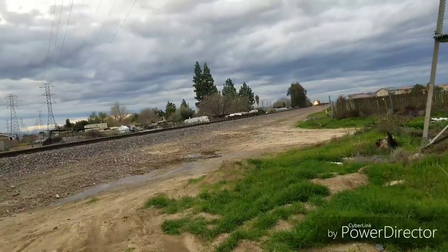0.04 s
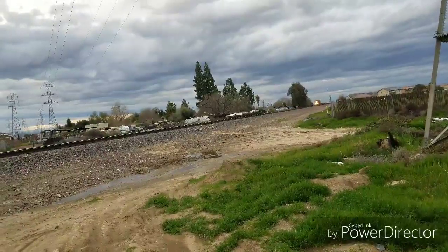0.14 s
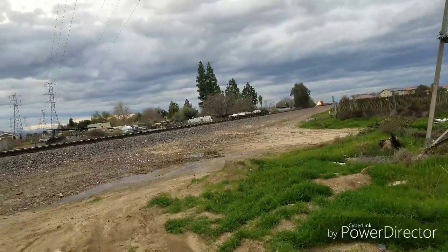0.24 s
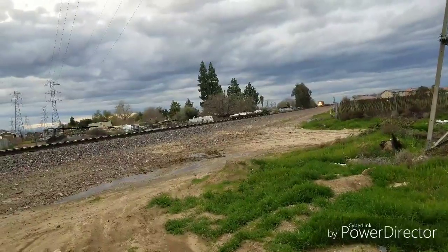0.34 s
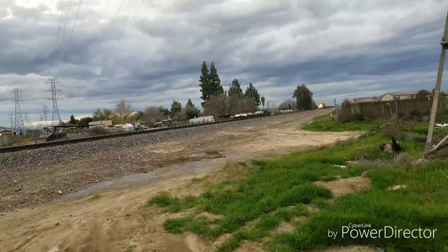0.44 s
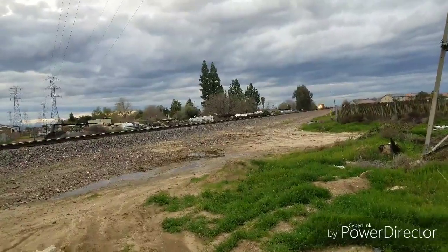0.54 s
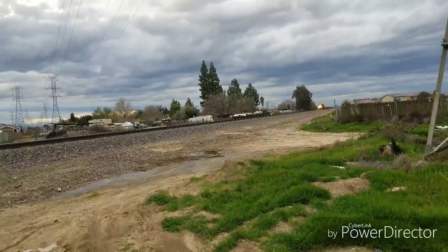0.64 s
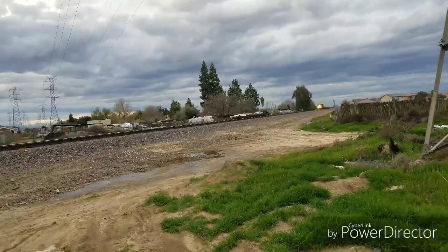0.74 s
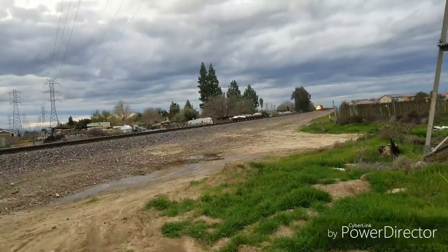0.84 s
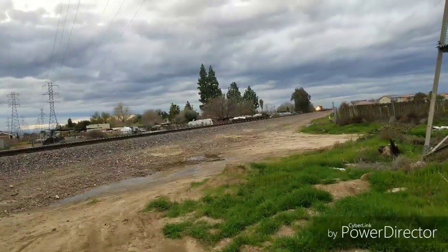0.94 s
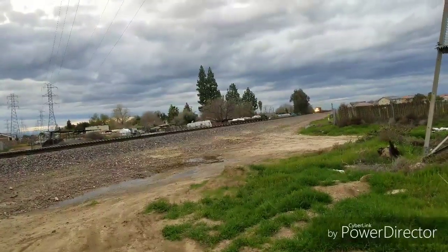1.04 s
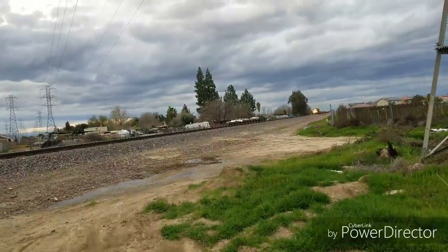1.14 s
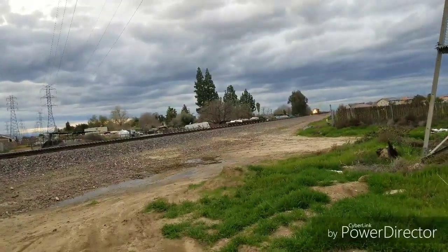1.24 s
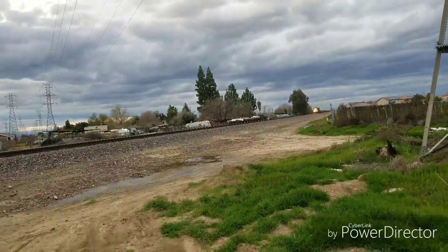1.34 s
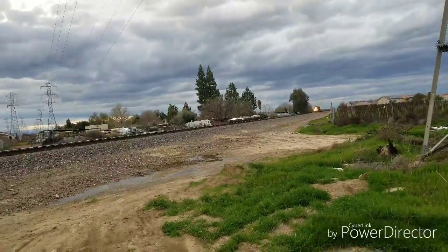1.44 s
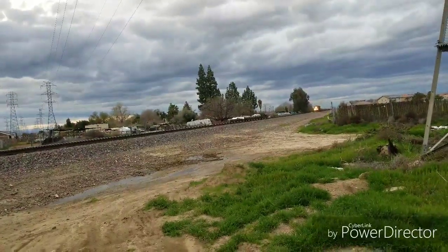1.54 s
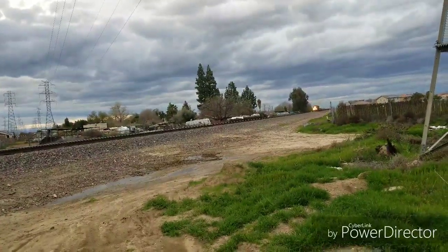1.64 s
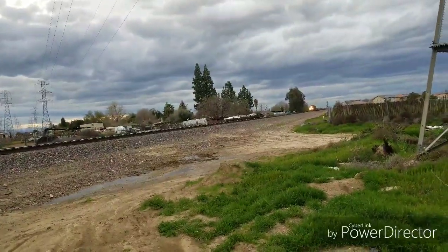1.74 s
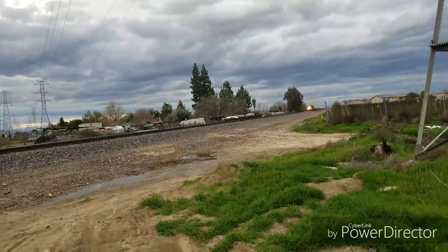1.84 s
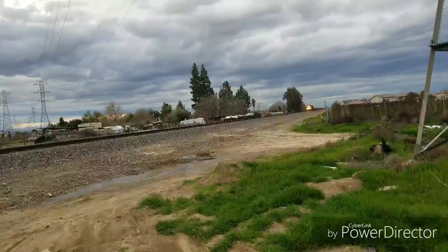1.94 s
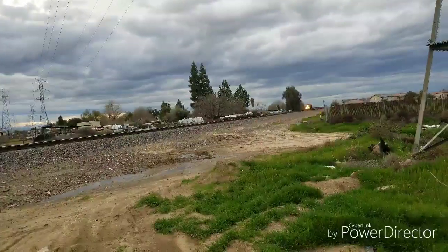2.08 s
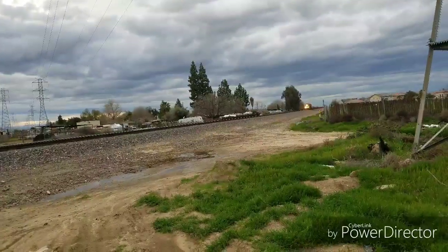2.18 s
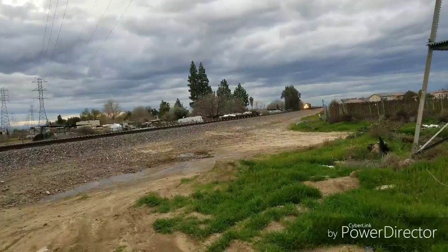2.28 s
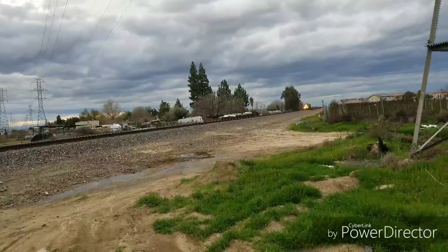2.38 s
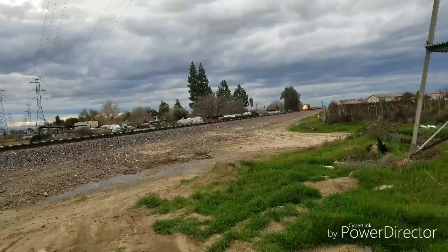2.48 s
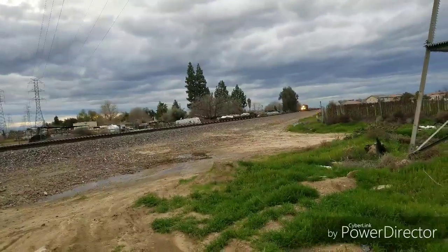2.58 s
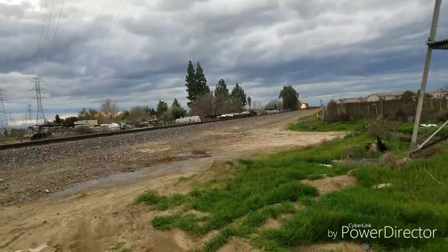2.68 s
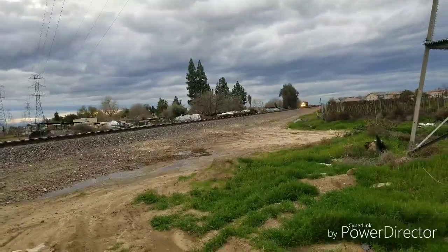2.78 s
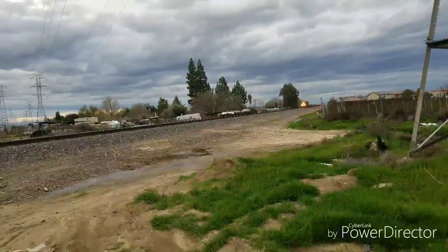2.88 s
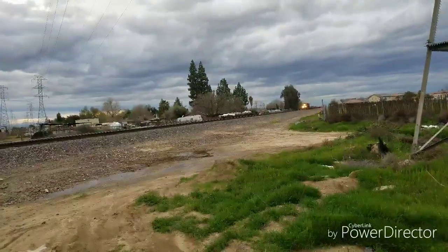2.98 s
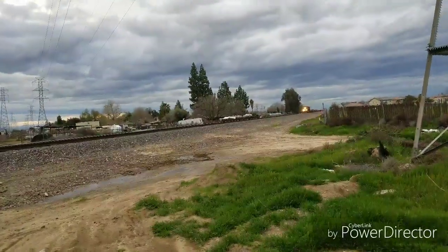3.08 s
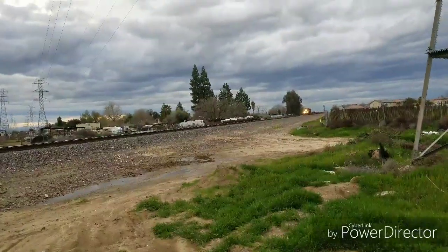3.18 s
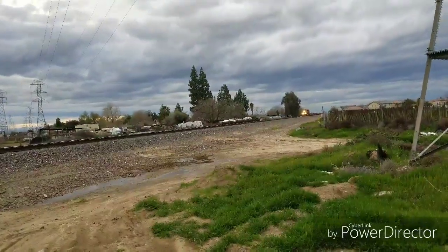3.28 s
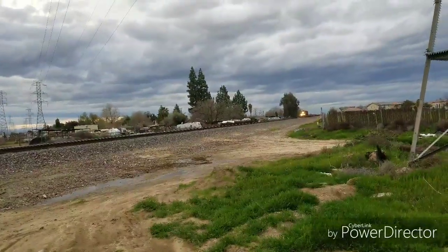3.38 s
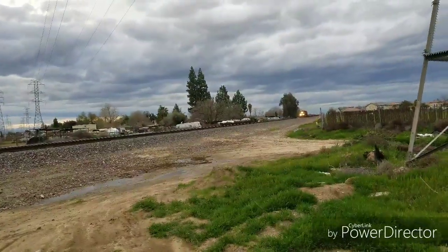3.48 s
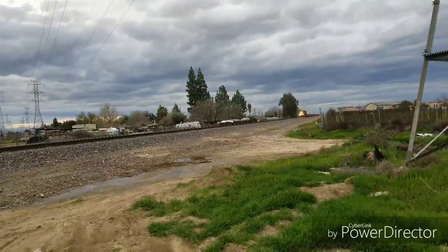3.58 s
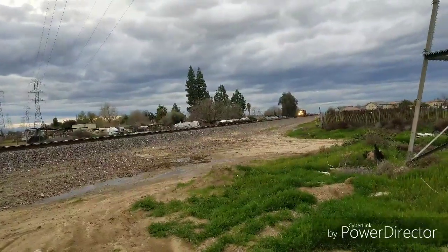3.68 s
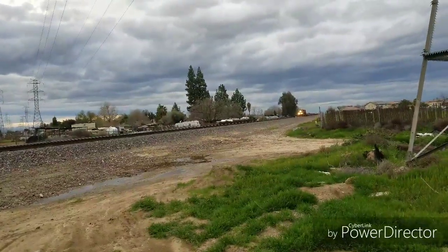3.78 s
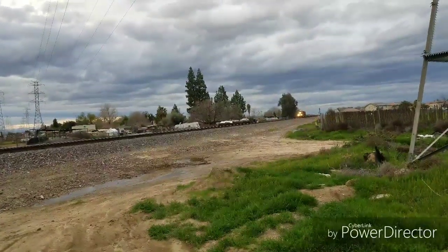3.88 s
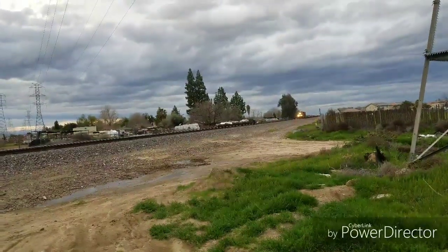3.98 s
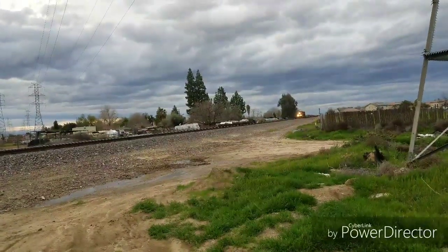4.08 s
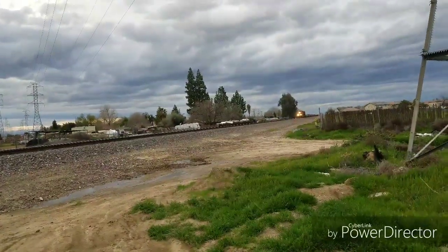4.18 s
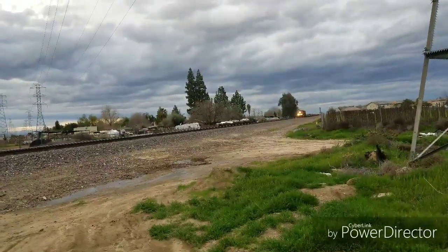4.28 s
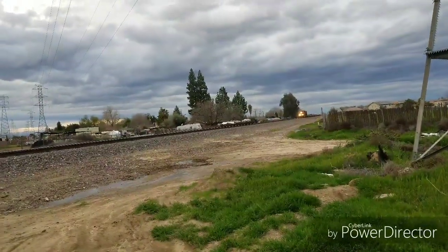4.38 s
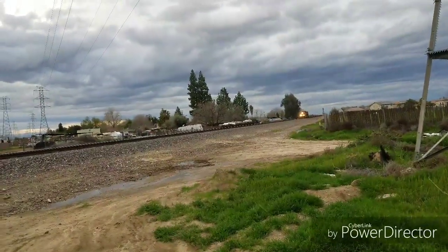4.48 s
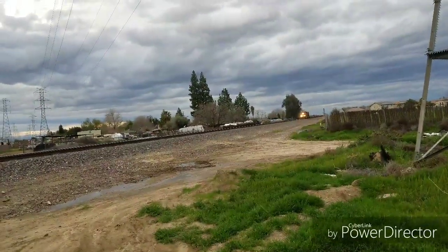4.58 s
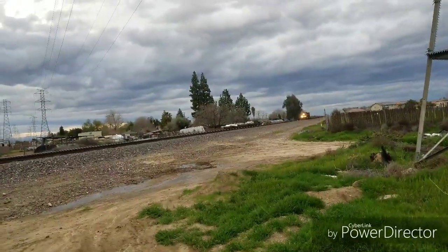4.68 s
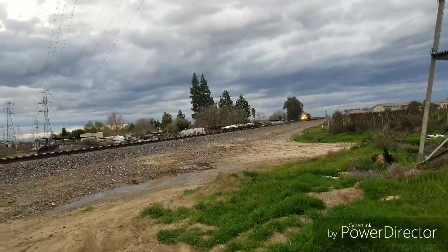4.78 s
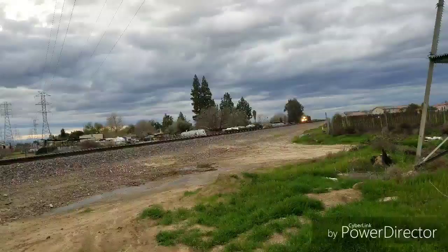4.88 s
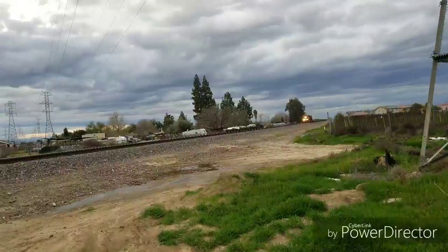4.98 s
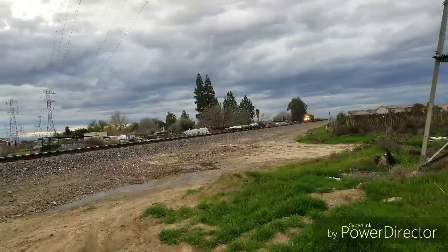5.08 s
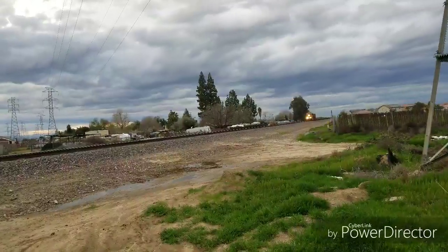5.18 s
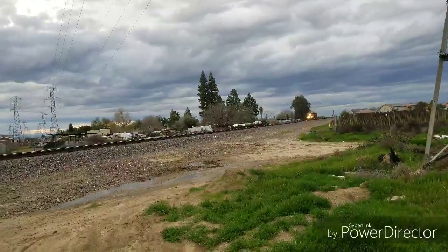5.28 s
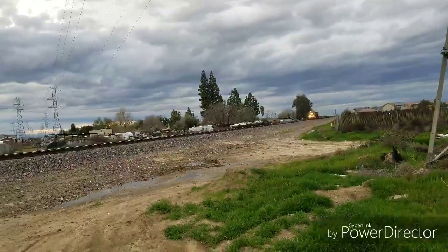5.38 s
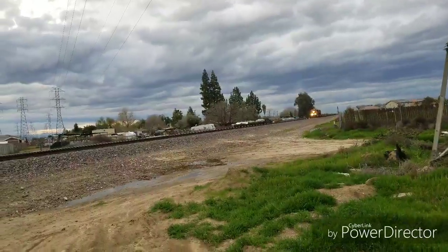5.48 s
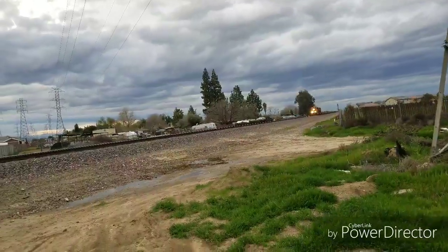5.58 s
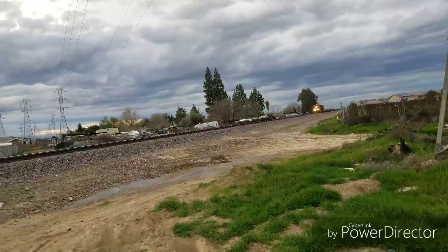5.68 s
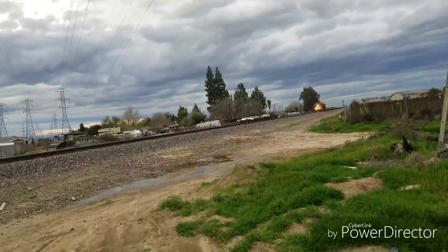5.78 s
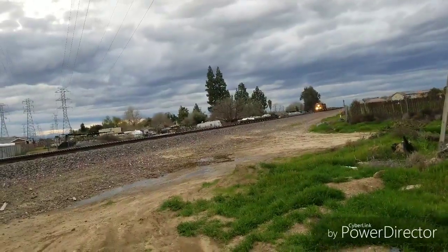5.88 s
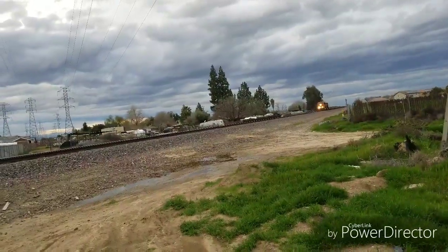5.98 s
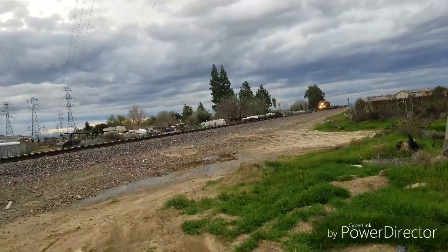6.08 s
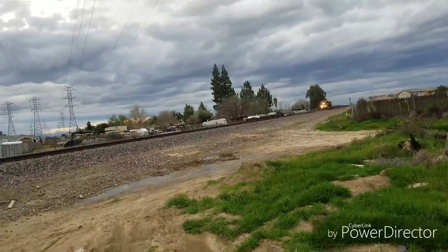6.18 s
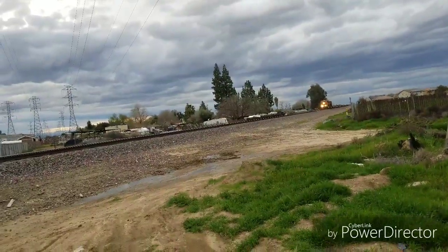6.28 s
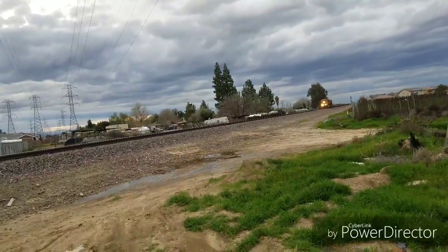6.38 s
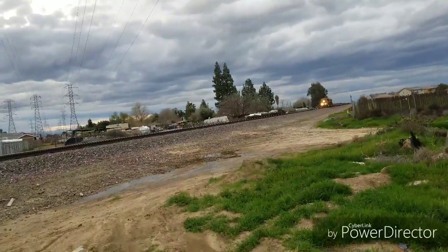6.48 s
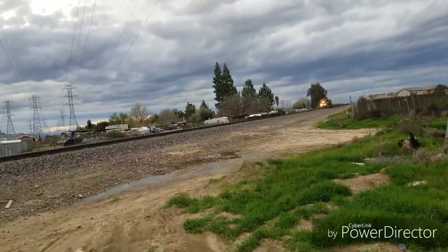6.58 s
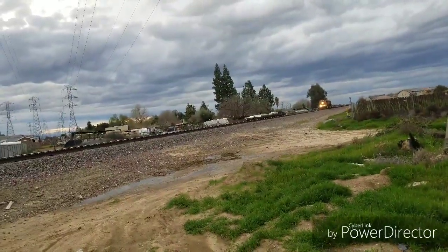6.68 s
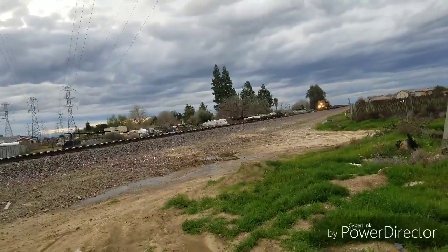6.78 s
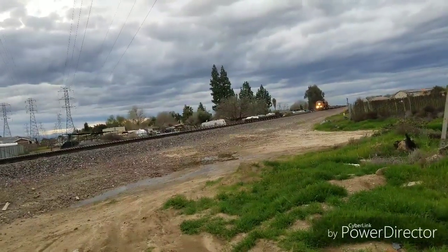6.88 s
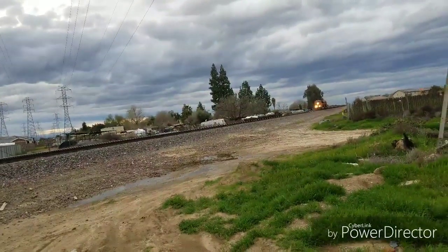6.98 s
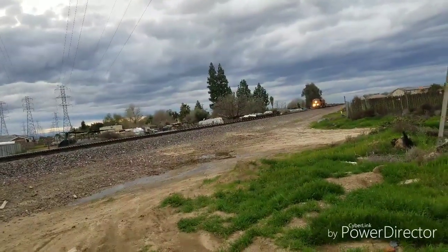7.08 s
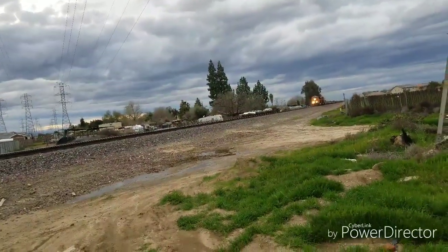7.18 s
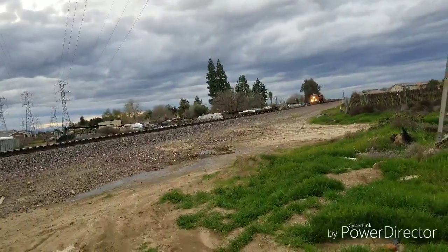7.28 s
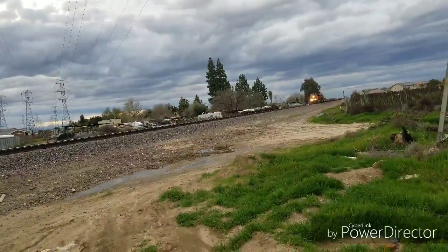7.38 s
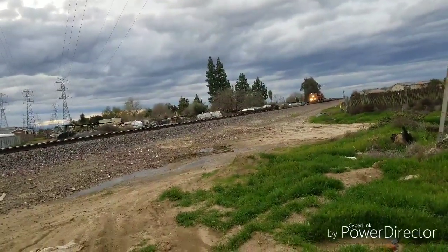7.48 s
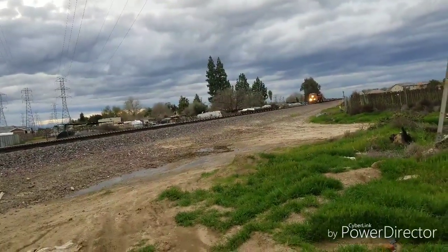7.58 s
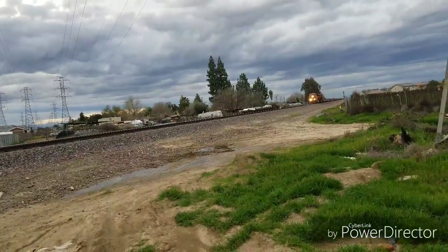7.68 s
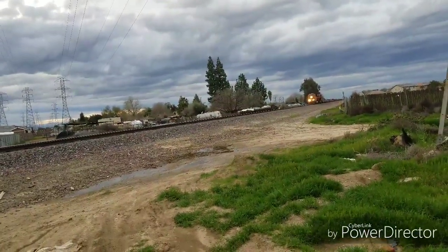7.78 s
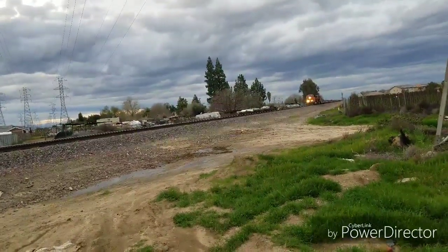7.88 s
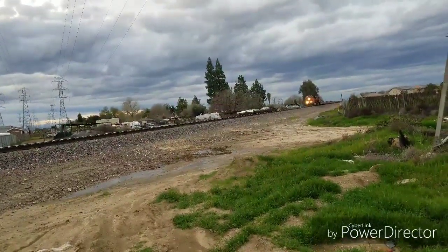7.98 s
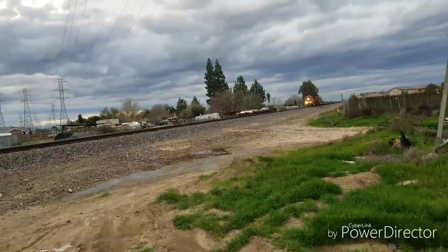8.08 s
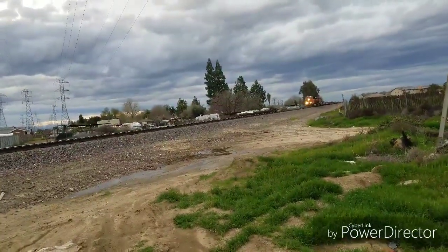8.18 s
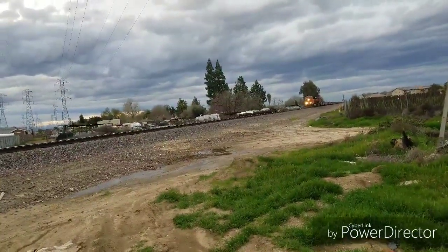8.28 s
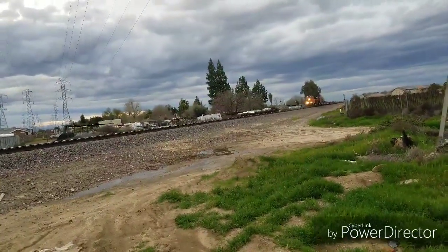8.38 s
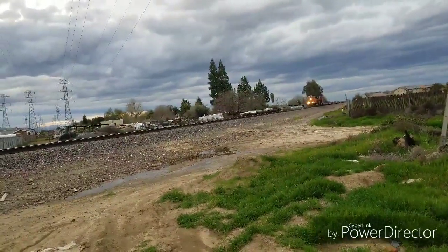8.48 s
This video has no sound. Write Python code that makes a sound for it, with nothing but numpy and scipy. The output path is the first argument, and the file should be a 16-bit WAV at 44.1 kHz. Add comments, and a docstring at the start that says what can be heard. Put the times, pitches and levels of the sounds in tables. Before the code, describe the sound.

The low engine drone and rumble of a far diesel train slowly swell, with distant highway traffic and briefly singing tyres behind.

```python
"""A distant freight train approaching

A diesel train comes up the line at full throttle: its periodic exhaust drones and throbs ever louder
over a growing rumble, gear whine and wheel hiss. Traffic roars and tyre treads sing on a far highway,
and a small bird chirps twice. Close by, a camera's lens drive fizzes on and off through the resonances
of its case, which rustles and ticks under the fingers."""
import sys
import numpy as np
from scipy import signal
from scipy.fft import rfft, irfft
from scipy.io import wavfile

SR = 44100
rng = np.random.default_rng(int(sys.argv[2]) if len(sys.argv) > 2 else 0)


def store_pcm(level_fs):
    """Save levels as 16-bit WAV."""
    pcm = np.round(np.clip(level_fs, -1, 1) * 32767).astype(np.int16)
    wavfile.write(sys.argv[1], SR, np.atleast_2d(pcm).T)


N = 376613
T = np.arange(N) / SR
PROGRESS = T / T[-1]
HZ = np.fft.rfftfreq(N, 1 / SR)
CYCLE_HZ = 8.785  # one four-stroke cycle, two turns of the crankshaft

# exhaust harmonics: (multiple of the cycle [1], relative level [dB])
EXHAUST_HARMONICS = [(1, -44), (2, -39), (3, -33), (4, -31), (5, -23), (6, -12), (7, -16), (8, -19),
                     (9, -2), (10, -13), (11, -8), (12, -8), (13, -17), (14, -9), (15, 0), (16, -8),
                     (17, -14), (18, -8), (19, -15), (20, -16), (21, -10), (22, -12), (23, -21), (24, -16),
                     (25, -13), (26, -14), (27, -15), (28, -12), (29, -21), (30, -17), (31, -22), (32, -26),
                     (33, -22), (34, -25), (35, -28), (36, -31), (37, -28)]
# growth of the exhaust on approach: (time [s], level [dB])
EXHAUST_LEVEL = [(0, -32.5), (1.5, -30.5), (3.3, -28.5), (4.2, -28), (5.7, -26), (6.8, -24.3), (7.4, -22),
                 (8.54, -21.5)]
# the harmonic that booms out as the train nears: (time [s], relative gain [dB])
BOOM_GAIN = [(0, -8), (.8, -8.5), (1.5, -6.5), (2.7, -3.5), (4, -1.5), (6.4, -2.5), (7.3, 3), (8.54, 1.5)]
# growth of the wheel hiss: (time [s], level [dB])
WHEEL_LEVEL = [(0, -65.5), (2, -60), (4, -58.5), (5.5, -56.5), (7, -50.5), (8.54, -48.5)]
# locomotive tones: (frequency [Hz], rms waver [Hz], final level [dB], total rise [dB])
MACHINE_TONES = [(376, 1, -54.5, 14), (1079, 6, -56, 4), (1619, 7, -57.5, 13), (2159, 7, -64.5, 11),
                 (4114, 25, -67, 20)]
# noise spectra of the sources: (frequency [Hz], relative spectral density [dB])
RUMBLE_SPECTRUM = [(15, -38), (32, -21), (44, -12), (54, 5.5), (68, 3), (95, -4), (108, 4.5), (126, -5.5),
                   (150, -1.5), (240, -4.5), (300, -14), (385, -20.5), (440, -34), (1500, -76)]
WHEEL_SPECTRUM = [(460, -10.5), (700, 4), (1300, -14), (1520, 2.5), (1900, -4), (2400, -4.5), (3200, -13),
                  (4200, -4), (5800, -10), (6600, -36.5), (8200, -42)]
HIGHWAY_SPECTRUM = [(200, -11), (470, -11.5), (680, -6), (900, -3), (1030, 2), (1130, -7.5), (1330, -14),
                    (1550, -9.5), (2000, -15.5), (3100, -27), (5800, -34.5), (7000, -47.5)]
LENS_SPECTRUM = [(2500, -10), (5500, -16), (7000, -29), (8400, -36), (9300, -15.5), (10900, 6), (11700, -1),
                 (12850, 13), (13500, -2.5), (14000, 8.5), (15000, 5), (15500, -14.5)]
RUSTLE_SPECTRUM = [(1500, -23), (3200, -3), (4200, -3.5), (5000, 1.5), (5800, 4), (6600, -10), (8200, -23),
                   (9400, -6), (11000, -6), (15000, -36.5)]
TICK_SPECTRUM = [(1500, -17), (3000, -6.5), (5000, 1), (6200, -2.5), (7800, -12.5), (9500, 1.5), (11000, 4),
                 (12500, -8), (15500, -10)]
# runs of the lens drive and strokes of the fingers: (start [s], duration [s], relative level [dB])
DRIVE_RUNS = [(.02, 0.086, -62.5), (.95, 0.5, -60.5), (1.43, 0.36, -57.5), (2.16, .61, -58.5),
              (2.89, 0.12, -60.5), (3.46, .78, -55.5), (4.79, 0.074, -59), (5.34, .24, -60.5),
              (5.63, 0.39, -53), (6.17, .11, -59), (6.39, 0.14, -54.5), (6.83, 0.51, -50),
              (7.46, 0.061, -52.5), (7.61, 0.095, -50.5), (8.07, .19, -52.5), (8.32, 0.24, -48)]
FINGER_STROKES = [(.4, .1, -60), (.57, 0.11, -56), (.82, 0.3, -60.5), (1.24, .16, -58), (1.62, 0.18, -58),
                  (2.02, 0.1, -60), (2.35, .2, -59.5), (2.66, 0.19, -58.5), (3.1, 0.13, -59.5),
                  (3.4, .16, -58), (3.72, 0.19, -60.5), (4.13, 0.082, -56.5), (4.78, .12, -58),
                  (5.12, 0.28, -59), (5.52, 0.077, -53), (5.86, .09, -54.5), (6.2, 0.1, -57),
                  (6.93, 0.075, -54), (7.22, .12, -57), (7.67, 0.056, -53)]
# singing tyres: (start [s], duration [s], pitch [Hz], relative level [dB], upper fifth re pitch [dB])
TYRE_PASSES = [(.53, .5, 1047, -51, -15), (1.62, 0.21, 1053, -50.5, -13), (3.598, 0.21, 1041, -61, 4.5),
               (3.79, 0.084, 1041, -43.5, -5.5), (3.95, 0.065, 1035, -40, -14),
               (4.42, 0.23, 1053, -47.5, -9), (4.69, 0.14, 1025, -45, -16), (5, 0.31, 993, -51.5, -9.5),
               (6.18, 0.64, 1011, -47.5, -14), (6.85, .3, 999, -50.5, -7), (7.2, .38, 982, -49, -22)]
# case ticks: (time [s], peak [dB], resonance [Hz], fall to either side [dB/octave], left - right [dB])
CASE_TICKS = [(0.572, -44, 4470, 16, -6), (0.598, -34, 11100, -1, 0), (0.606, -35, 11100, -1, -5),
              (0.64, -41, 11000, -2, -2), (0.7267, -35.5, 12500, -1, -1), (.79, -49, 5050, 15, -1),
              (1.151, -41, 5200, 14, -1), (2.0368, -35, 10000, 3, -1), (2.053, -43, 10900, -2, -4),
              (2.698, -37, 3800, 21, -5), (3.273, -40, 10600, -4.5, 2), (3.707, -44.5, 9200, 8, 5),
              (4.655, -46, 10400, 2, 1), (4.8485, -37, 10800, 4, -1), (4.9092, -43.5, 4715, 12, -9),
              (4.9696, -37.5, 4790, 5, -4), (5.314, -35.5, 3020, 14, -3), (5.652, -38, 11500, -4, -3),
              (6.2, -42, 3500, 11, -2)]
# bird calls: (start [s], duration [s], start pitch [Hz], end pitch [Hz], level [dB])
BIRD_CHIRPS = [(1.868, 0.057, 3080, 2815, -69), (5.23, 0.074, 4700, 5350, -63)]
# likeness of noise at the two microphone ports: (frequency [Hz], correlation [1])
PORT_CORRELATION = [(60, .99), (150, .997), (280, .992), (500, .92), (1000, .6), (2000, .32), (4000, .2)]
# balance of noise between the ports: (frequency [Hz], left - right [dB])
PORT_BALANCE = [(50, 5), (130, 0.8), (400, 3), (1000, 0.9), (2000, -1), (4500, -3), (9000, 3)]


def amp(db):
    """Amplitude ratio of a level in decibels."""
    return 10 ** (np.asarray(db) / 20)


def pan(db):
    """Left and right gains for a level difference of db."""
    return amp([[db / 2], [-db / 2]])


def unit_rms(x):
    """Normalisation to an rms of 1."""
    return x / np.sqrt(np.mean(abs(x) ** 2) + 1e-30)


def over_time(rows):
    """Linear interpolation of (time, value) rows at every sample."""
    return np.interp(T, *np.transpose(rows))


def over_frequency(rows, hz=HZ):
    """Interpolation of (frequency, value) rows on a logarithmic frequency axis."""
    row_hz, value = np.transpose(rows)
    return np.interp(np.log(hz + 1), np.log(row_hz), value)


def drift(rate_hz):
    """Random fluctuation of rms 1: a superposition of sinusoids below rate_hz."""
    t = np.linspace(0, T[-1], num=1024)
    speeds, phases = rng.random((2, 12, 1))
    waves = np.sin(2 * np.pi * (rate_hz * speeds * t + phases))
    return np.interp(T, t, unit_rms(waves.sum(0)))


def stereo_noise(spectrum):
    """Partially coherent noise: the two ports agree at long wavelengths and differ at short ones."""
    common, independent = rfft(rng.standard_normal((2, N)))
    correlation = np.clip(over_frequency(PORT_CORRELATION), -1, 1)
    right = correlation * common + np.sqrt(1 - correlation ** 2) * independent
    side = amp(over_frequency(PORT_BALANCE) / 2)
    pair = irfft(np.array([common * side, right / side]) * spectrum, N)
    return pair / np.sqrt(np.mean(pair.mean(0) ** 2))


def gate(start_s, length_s, attack_s, release_s):
    """Envelope with a linear rise, a hold and an exponential decay."""
    rise = np.clip((T - start_s) / attack_s, 0, 1)
    return rise * np.exp(-np.maximum(T - start_s - length_s, 0) / release_s)


def bursts(rows, rest_db, attack_s, release_s):
    """Envelope of an intermittent source that swells from a resting level for each row."""
    gain = amp(rest_db)
    for start_s, length_s, db in rows:
        gain = np.maximum(gain, amp(db) * gate(start_s, length_s, attack_s, release_s))
    return gain


def exhaust(boom_order=15, fade_db=0.16, brighten_db=2):
    """Harmonic series: unequal cylinders sound every multiple of the cycle; moving air fades each."""
    cycles = CYCLE_HZ * T + .003 * drift(.4)
    nearness = PROGRESS - .75
    drone, power = np.zeros(N), 0
    for order, db in EXHAUST_HARMONICS:
        # the upper harmonics gain most as the distance shrinks
        tilt_db = brighten_db * nearness * np.log2(order / boom_order)
        gain = amp(db + fade_db * drift(1.144) + tilt_db)
        if order == boom_order:
            gain = amp(db + over_time(BOOM_GAIN))
        wander = .12 * drift(2)
        drone += gain * np.sin(2 * np.pi * (order * cycles + rng.random()) + wander)
        power += gain ** 2 / 2
    return amp(over_time(EXHAUST_LEVEL)) * drone / np.sqrt(power) * pan(1.6)


def rumble(bass_db=-40, bass_rise_db=9, body_db=-10, split_hz=85, throb=0.36):
    """Rolling weight makes the bass; above it, exhaust turbulence is modulated at the crankshaft rate."""
    spectrum = amp(over_frequency(RUMBLE_SPECTRUM))
    bass_share = 1 / (1 + (HZ / split_hz) ** 8)
    bass = stereo_noise(spectrum * np.sqrt(bass_share))
    turbulence = stereo_noise(spectrum * np.sqrt(1 - bass_share))
    puffs = 1 + throb * np.cos(2 * np.pi * 2 * CYCLE_HZ * T)
    rolling = amp(bass_db + bass_rise_db * (PROGRESS - .5)) * bass
    return rolling + amp(over_time(EXHAUST_LEVEL) + body_db) * puffs * turbulence


def wheels():
    """Broadband noise of steel rolling on steel and of cooling fans, growing as the train nears."""
    return amp(over_time(WHEEL_LEVEL)) * stereo_noise(amp(over_frequency(WHEEL_SPECTRUM)))


def whines(fade_db=2, port_lag_rad=1.0):
    """Tones of rotating gears, blower and turbocharger, modulated by the air along their path."""
    out = np.zeros((2, N))
    for hz, waver_hz, db, rise_db in MACHINE_TONES:
        phase = 2 * np.pi * np.cumsum(hz + waver_hz * drift(2 * waver_hz)) / SR
        level_db = db + rise_db * (PROGRESS - 1) + fade_db * drift(4)
        lag = port_lag_rad * np.array([np.zeros(N), drift(2)])
        out += amp(level_db) * np.sqrt(2) * np.sin(phase + lag)
    return out


def highway(level_db=-46.5, rise_db=2.0, flutter_db=1.02):
    """Incoherent summation: far traffic merges into an even roar, strongest near 1 kHz."""
    gain = amp(level_db + rise_db * (PROGRESS - .5) + flutter_db * drift(9))
    return gain * stereo_noise(amp(over_frequency(HIGHWAY_SPECTRUM)))


def lens_drive(trim_db=2, mode_spacing_hz=25, mode_spread_db=3.2, lag_s=0.000414, flicker_db=0.5):
    """Forced vibration: the lens drive idles and runs, exciting the many small modes of the case."""
    left, independent = rfft(rng.standard_normal((2, N)))
    mode_hz = np.arange(0, SR / 2, mode_spacing_hz)
    modes_db = mode_spread_db * np.interp(HZ, mode_hz, rng.standard_normal(len(mode_hz)))
    # the drive sits by the left port, so its sound reaches the right one later and weaker
    right = (left + independent) / np.sqrt(2) * np.exp(-2j * np.pi * HZ * lag_s)
    spectrum = amp(over_frequency(LENS_SPECTRUM) + modes_db)
    fizz = unit_rms(irfft(np.array([left, right]) * spectrum, N))
    effort = bursts(DRIVE_RUNS, rest_db=-71 + 9 * PROGRESS, attack_s=0.031, release_s=0.092)
    return fizz * effort * amp(trim_db + flicker_db * drift(25)) * pan(2)


def rustle(trim_db=-2, shift_db=3.2, grain_db=2.34):
    """Friction: fingers and sleeve slip unevenly on the case, in short strokes over the grip's rub."""
    grip_db = -68 + 7 * PROGRESS + shift_db * drift(5)
    pressure = bursts(FINGER_STROKES, rest_db=grip_db, attack_s=0.03, release_s=0.04)
    slips = amp(trim_db + grain_db * drift(60))
    return pressure * slips * stereo_noise(amp(over_frequency(RUSTLE_SPECTRUM)))


def tyres(trim_db=-2, sag_hz_per_s=12, waver_hz=3, flicker_db=2.0, port_lag_rad=0.49):
    """Periodic tread contact: its second and third harmonics sink in pitch as each vehicle goes by."""
    out = np.zeros((2, N))
    waver = waver_hz * drift(24)
    lag = port_lag_rad * np.array([np.zeros(N), drift(6)])
    flickers = amp(trim_db + flicker_db * np.array([drift(24), drift(24)]))
    for start_s, length_s, hz, db, fifth_db in TYRE_PASSES:
        swell = gate(start_s, length_s, attack_s=0.05, release_s=0.12)
        on = swell > .001
        pitch_hz = hz - sag_hz_per_s * (T[on] - start_s) + waver[on]
        tread_phase = 2 * np.pi * np.cumsum(pitch_hz / 2) / SR
        for order, level_db, flicker in zip((2, 3), (db, db + fifth_db), flickers):
            tone = np.sqrt(2) * np.sin(order * tread_phase + lag[:, on])
            out[:, on] += amp(level_db) * (swell * flicker)[on] * tone
    return out


def ticks(snap_s=0.00095, tail_s=0.051, tail_db=-21, ring_db=8, half_width_hz=450):
    """Impulse excitation: each tiny snap of plastic rings a local resonance of the case."""
    out = np.zeros((2, N))
    t, hz = T[:4096], np.fft.rfftfreq(4096, 1 / SR)
    snap = t / snap_s * np.exp(1 - t / snap_s)
    envelope = snap + amp(tail_db) * np.exp(-t / tail_s)
    for start_s, peak_db, ring_hz, fall_db, pan_db in CASE_TICKS:
        resonance_db = ring_db / (1 + ((hz - ring_hz) / half_width_hz) ** 2)
        octaves_away = abs(np.log2((hz + 1) / ring_hz))
        spectrum = amp(over_frequency(TICK_SPECTRUM, hz) + resonance_db - fall_db * octaves_away)
        tick = irfft(rfft(rng.standard_normal((2, len(t)))) * spectrum) * envelope
        tick /= abs(tick.mean(0)).max()
        at = round(start_s * SR)
        out[:, at:at + len(t)] += tick * amp(peak_db) * pan(pan_db)
    return out


def bird():
    """Linear frequency sweep: each chirp of a far bird is one soft, gliding whistle."""
    out = np.zeros(N)
    for start_s, length_s, start_hz, end_hz, db in BIRD_CHIRPS:
        elapsed = np.clip((T - start_s) / length_s, 0, 1)
        hz = start_hz + (end_hz - start_hz) * elapsed
        whistle = np.sqrt(2) * np.sin(2 * np.pi * np.cumsum(hz) / SR)
        out += amp(db) * np.sin(np.pi * elapsed) * whistle
    return out * pan(-1)


def scene():
    """Superposition of the train, the highway, the camera's own small noises and the bird."""
    train = exhaust() + rumble() + wheels() + whines()
    return train + highway() + lens_drive() + rustle() + tyres() + ticks() + bird()


def record(dry):
    """Band limiting: a linear-phase low-pass filter removes the highest treble."""
    cutoff_hz = 15600
    lowpass = signal.firwin(511, cutoff_hz, window=("kaiser", 9), fs=SR)
    return signal.oaconvolve(dry, lowpass[None], "same")


dry = scene()
out = record(dry)
store_pcm(out)
```